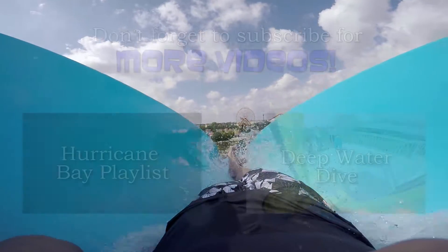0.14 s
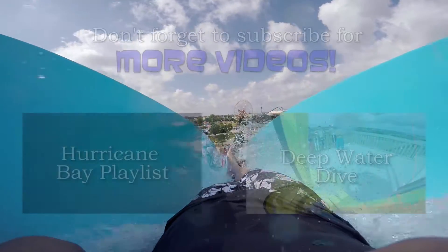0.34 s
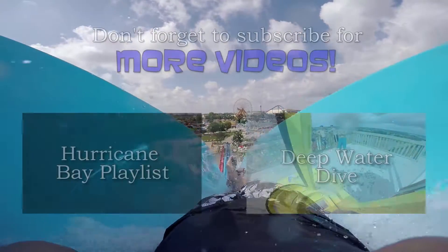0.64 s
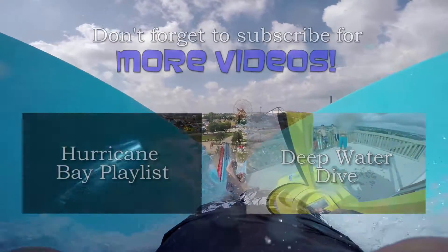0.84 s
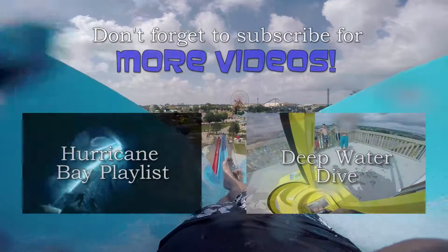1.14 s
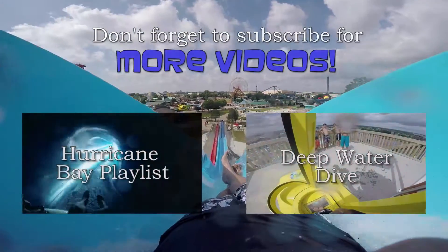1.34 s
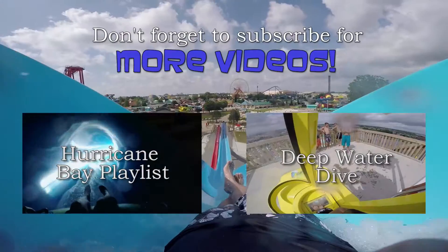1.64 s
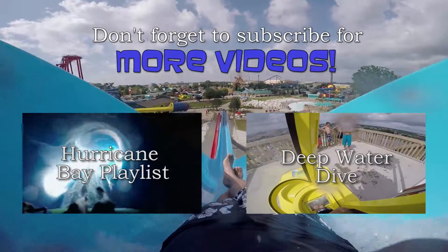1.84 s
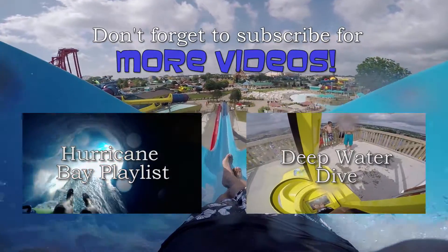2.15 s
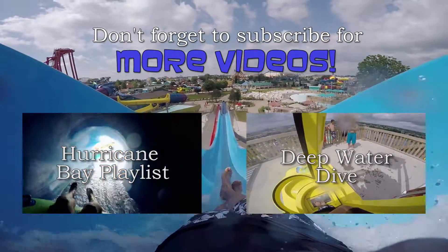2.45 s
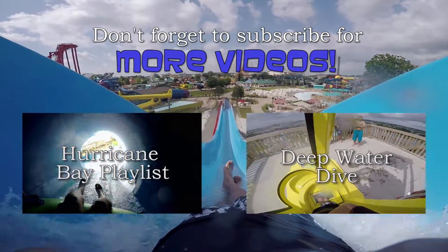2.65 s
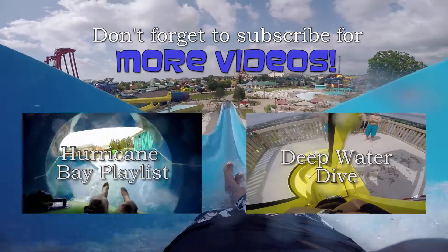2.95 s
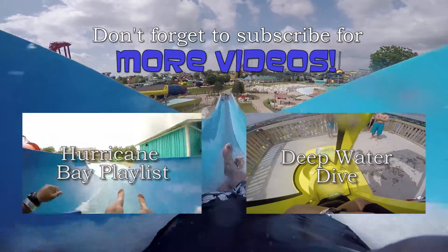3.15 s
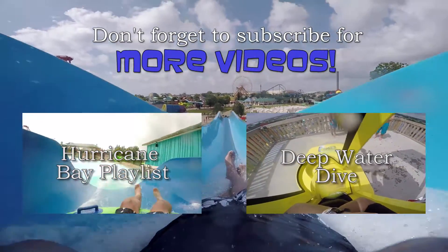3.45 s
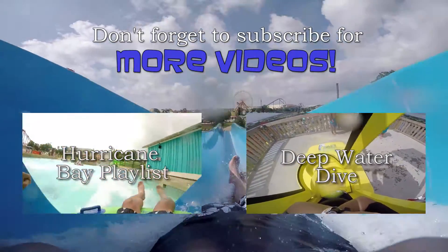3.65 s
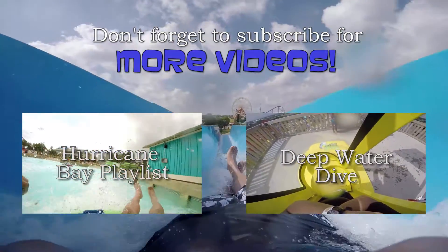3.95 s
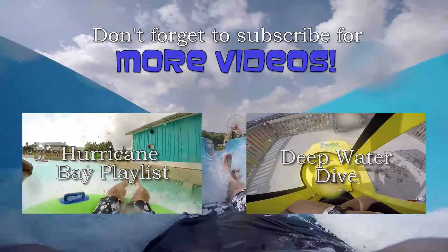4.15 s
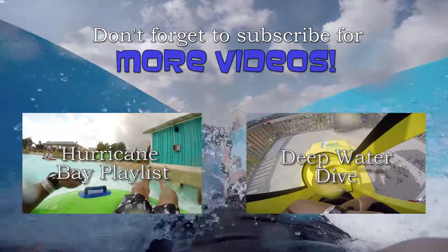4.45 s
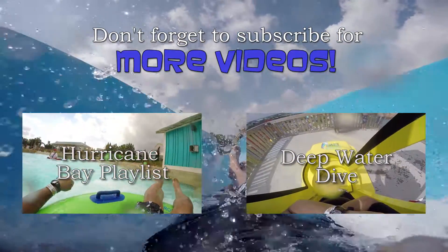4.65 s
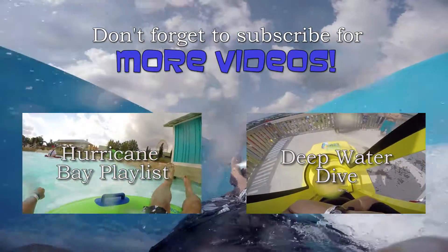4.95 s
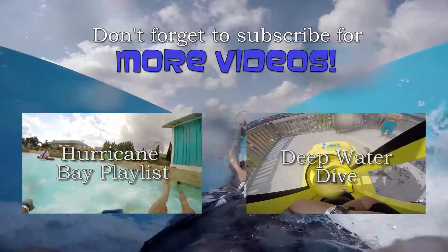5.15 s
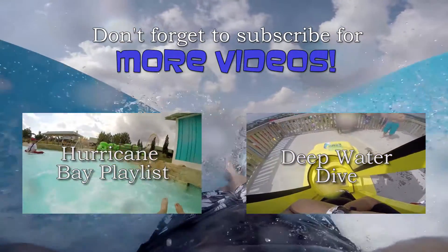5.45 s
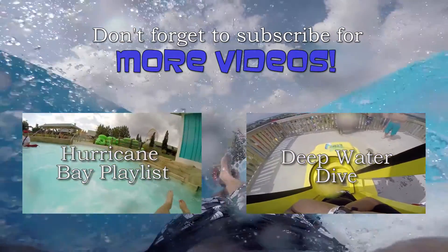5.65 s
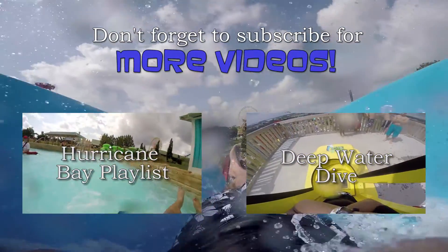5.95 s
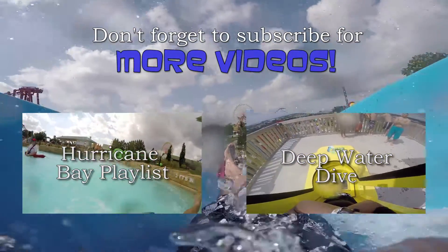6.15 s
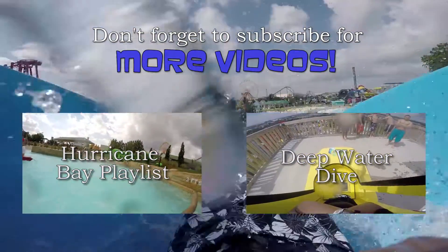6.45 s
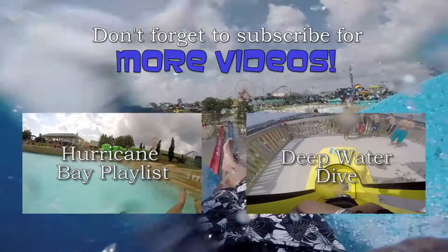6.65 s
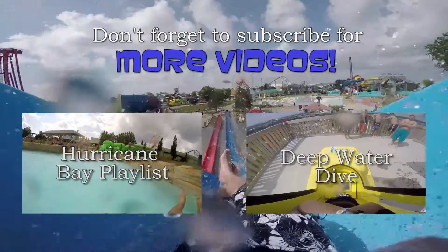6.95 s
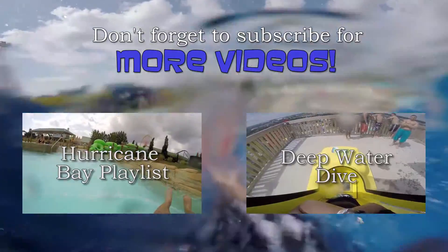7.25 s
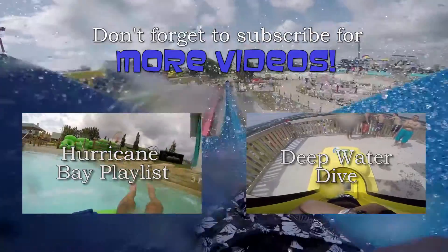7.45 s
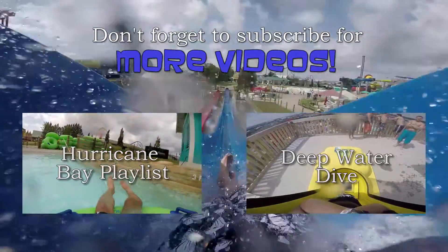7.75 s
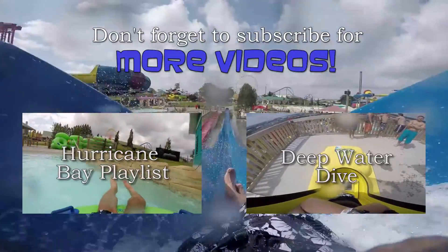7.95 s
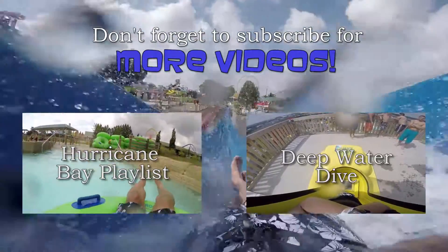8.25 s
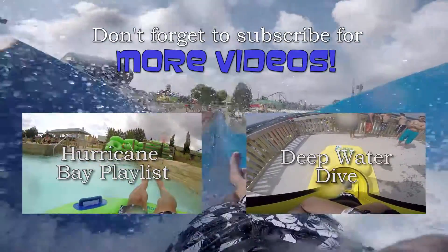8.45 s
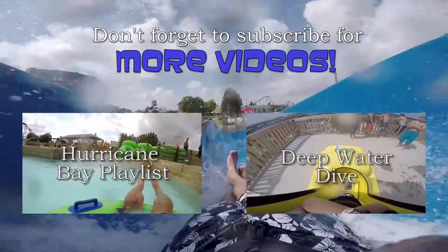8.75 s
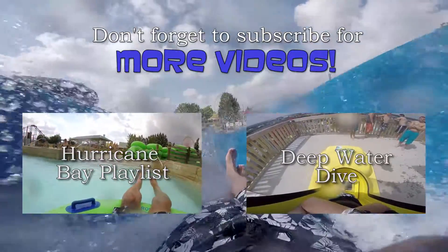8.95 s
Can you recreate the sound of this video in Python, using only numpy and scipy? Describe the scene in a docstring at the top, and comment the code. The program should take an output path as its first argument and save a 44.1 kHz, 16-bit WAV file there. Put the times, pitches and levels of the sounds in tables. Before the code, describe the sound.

Water rushes and gurgles around a rider on a water slide, building from a steady wash to heavy slops, splashes and sharp knocks.

```python
"""Water chute ride inside a sealed housing

A rider slides down an open water chute, heard from inside a sealed plastic camera housing on the chest.
Shaped noise gives the rush and low churn of the water sheet, and the jolting that pumps the housing in the bass.
Spray, drops and heavy slops are impulses that ring damped housing modes; drops and slops add short tones
of their own. Bumps are single damped pushes, mist is crackling hiss, and splashes lift the water layers."""
import sys
import numpy as np
from scipy import signal
from scipy.fft import rfft, irfft, next_fast_len
from scipy.io import wavfile
from scipy.ndimage import uniform_filter1d

SR = 44100
rng = np.random.default_rng(int(sys.argv[2]) if len(sys.argv) > 2 else 0)


def wav_out(sig):
    """Save sig, one row per channel (or a flat mono array), as 16-bit PCM at SR to the path in sys.argv[1]."""
    wavfile.write(sys.argv[1], SR, np.round(np.clip(np.atleast_2d(sig).T, -1, 1) * 32767).astype(np.int16))


N = 401751

# Levels in the tables and settings are nominal: the layers scale them further.
# Modes of the plastic housing: [f/Hz, level/dB, t60/s]
HOUSING_MODES = [(94, -6.5, 0.06), (172, -9, 0.049), (302, -9.5, 0.013), (469, 3.5, 0.024),
                 (590, -4, 0.019), (870, -6, 0.021), (1004, -2.5, 0.043), (1231, -2.5, 0.035),
                 (1566, 1, 0.0094), (2222, 3.5, 0.0061), (2800, -7.5, 0.017), (3275, -2.5, 0.012),
                 (3526, -4, 0.011), (5070, -14, 0.0087), (6390, -9.5, 0.011), (7200, -18.5, 0.015)]
# Noise spectra of the jolting, churn, rush and mist: [f/Hz, relative level/dB]
JOLT_SPECTRUM = [(3, -33.5), (6, -2.5), (17, 4), (24, 2), (33, -8.5), (54, -18), (100, -41.5), (200, -58)]
CHURN_SPECTRUM = [(50, 9.5), (90, 2.5), (200, -2.5), (450, -3.5), (750, -7), (1100, -51)]
RUSH_SPECTRUM = [(350, -57.5), (600, -27), (655, -19), (875, -7.5), (948, -13.5), (981, -10), (1050, -9.5),
                 (1150, -4.5), (1370, -3), (1470, -6), (1750, -16.5), (2030, -16), (3000, -21),
                 (3900, -41.5), (6600, -120)]
MIST_SPECTRUM = [(2500, -17.5), (3800, 1.5), (5000, -1.5), (6250, -4), (7400, -6.5), (8400, -44.5)]

# Strength of the jolting: [t/s, level/dB]
JOLTING_LEVEL = [(0.0, -33.5), (0.15, -28), (1.85, -33.5), (2.6, -24), (2.95, -33), (3.14, -20.5),
                 (3.27, -25.5), (3.4, -12.5), (3.5, -24), (3.78, -14.5), (3.9, -19.5), (4.16, -16.5),
                 (4.41, -31), (4.77, -17.5), (4.92, -24.5), (5.4, -17.5), (5.74, -21), (5.85, -30.5),
                 (6.3, -32.5), (7.28, -32.5), (7.5, -20), (7.62, -17), (7.7, -29), (7.74, -33), (7.91, -51),
                 (8.02, -28.5), (8.27, -19), (8.36, -35), (8.45, -23), (8.9, -19), (9.11, -25)]
# Water between splashes: [t/s, rush level/dB, low churn level/dB, spray level/dB]
RIDE_LEVELS = [(0.0, -43, -49.5, -55), (0.35, -38, -49, -48.5), (0.8, -40.5, -48, -49.5),
               (1.17, -41, -48, -53.5), (1.68, -40, -45.5, -56), (1.76, -36, -46.5, -56.5),
               (1.93, -40, -46, -57), (2.04, -32, -45, -49.5), (2.15, -36.5, -45, -50.5),
               (2.5, -34, -42.5, -51.5), (2.69, -35.5, -45.5, -52.5), (2.76, -32, -44, -51),
               (2.84, -36.5, -45, -51), (3.2, -34, -41, -46), (3.497, -37, -48, -40),
               (4.1, -31, -35.5, -44.5), (4.45, -36, -42.5, -42), (4.9, -33, -39.5, -36.5),
               (5.1, -35.5, -40.5, -40.5), (5.65, -30.5, -38, -39.5), (5.85, -37.5, -38.5, -44.5),
               (6.34, -32.5, -36.5, -43.5), (6.9, -39, -40.5, -45), (7.1, -39.5, -40, -46.5),
               (7.48, -34.5, -32, -39), (7.72, -35, -35, -36), (7.735, -34, -47, -43),
               (7.76, -40, -46, -45), (7.8, -38.5, -42, -55), (7.851, -57, -47, -54),
               (7.971, -54, -54, -56.5), (7.98, -41.5, -47, -48), (8.17, -38.5, -43, -42.5),
               (8.47, -32.5, -38, -35), (8.9, -39, -42.5, -37), (9.11, -26.5, -34, -31)]
# Rush brightening or darkening as the sheet thins or thickens: [t/s, upper over lower part level/dB]
RUSH_BALANCE = [(0, 5), (0.7, 2.5), (1.3, 2), (2.2, 4.5), (3.1, 6), (3.6, 1.5), (5, 2.5), (6.3, -2),
                (6.8, -3.5), (7.5, -3.5), (8, 0.5), (9.11, -2.5)]

# Sheets of water thrown over the housing: [start t/s, length/s, spray gain/dB]
SPLASH_SHEETS = [(0.518, 0.04, 4), (3.304, 0.12, 6), (3.577, 0.19, 9.5), (3.832, .06, 4),
                 (4.299, 0.12, 5.5), (4.486, 0.21, 6), (5.713, 0.11, 7), (6.718, 0.052, 5),
                 (7.168, 0.055, 3.5), (7.549, 0.13, 7.5), (8.039, .04, 5), (8.227, 0.13, 6.5),
                 (8.605, 0.067, 5.5), (8.683, 0.06, 2.5), (9.018, 0.17, 5.5)]
# Bumps that shove the whole housing: [t/s, strength/dB, push length/ms, rebound t60/ms]
BUMPS = [(0.904, -27, 1.35, 9.1), (0.96, -28, 1.7, 13), (1.0528, -22.5, 2, 9.3), (3.1262, -17, 1.4, 35),
         (3.131, -18, 6.7, 58), (3.134, -8, 8.6, 57), (4.0228, -33, 0.84, 7), (4.568, -12, 0.59, 6),
         (4.6192, -6, 0.31, 6.6), (4.6207, 1, 0.61, 5.6), (5.748, -13.5, 1.2, 14), (6.577, -18.5, 11, 61),
         (7.139, -11.5, 12, 51), (7.272, -9.5, 7.4, 36), (7.714, -13.5, 5.5, 37), (8.41, -8, 0.84, 7.8),
         (8.6058, -4, 1.16, 9), (8.6059, -11, 2.3, 14), (8.607, -15, 5.3, 20), (8.6297, -12, 0.6, 6),
         (8.6376, -9, 0.83, 7), (8.6423, -6, 0.85, 11), (8.884, -14, 0.82, 9)]
# Slops of water that knock the housing at set times: [t/s, peak level/dB, pitch f/Hz, thud level/dB]
TIMED_SLOPS = [(0.344, -24.5, 990, -52.5), (0.5408, -24, 1010, -55.5), (0.7193, -21.5, 1030, -55),
               (0.7531, -16, 1190, -52), (0.7868, -17, 1220, -52), (0.9036, -17.5, 990, -47),
               (0.959, -31, 1010, -44), (1.01, -27, 676, -42), (1.0542, -21, 975, -37),
               (1.1877, -17, 1220, -62), (1.262, -24.5, 1060, -64), (2.752, -23, 1360, -57),
               (3.1245, -18, 1180, -44), (3.127, -20.5, 790, -47), (3.146, -23, 450, -45),
               (3.171, -32, 430, -50), (3.4521, -17.5, 1010, -45), (3.5761, -27, 990, -50),
               (3.8384, -12.5, 1400, -51), (3.9889, -17.5, 1200, -52), (4.0222, -9, 1210, -43),
               (4.0676, -17, 1010, -49), (4.2436, -13, 1180, -39), (4.338, -14, 1020, -51),
               (4.5069, -20, 1010, -51), (4.5685, -14.5, 1270, -50), (4.601, -19, 1260, -52),
               (4.606, -18, 1200, -52), (4.6205, -9, 885, -35), (4.631, -14, 1050, -49),
               (4.7478, -16, 890, -49), (4.7947, -16, 1230, -56), (4.8227, -20.5, 1030, -49),
               (4.8689, -24, 1020, -51), (4.9267, -15, 1060, -48), (5.0349, -24, 1210, -53),
               (5.0704, -17, 1210, -37), (5.1359, -17, 1270, -47), (5.6661, -14, 1240, -50),
               (5.7351, -14, 1200, -41), (5.7605, -9, 1000, -38), (5.8027, -10.5, 1200, -34),
               (6.2586, -16.5, 1170, -32.5), (6.5757, -15, 1010, -30), (6.6642, -13.5, 1030, -50),
               (6.7018, -15, 1060, -47), (6.7284, -10, 1260, -49), (6.7561, -1.5, 1035, -51),
               (6.8671, -18, 1000, -37), (6.9071, -20, 980, -45), (6.9302, -21, 980, -57),
               (6.95, -18, 960, -29), (7.0243, -14, 1100, -54), (7.1402, -10, 1120, -21.5),
               (7.1803, -16, 1010, -42), (7.196, -6, 1040, -37.5), (7.2745, -11, 1020, -29),
               (7.3021, -13.5, 1120, -44), (7.3383, -16.5, 1030, -47), (7.434, -17, 413, -49),
               (7.436, -16, 1040, -50), (7.479, -26, 800, -42), (7.496, -15.5, 630, -41),
               (7.5277, -11.5, 1340, -29), (7.5573, -12, 1210, -37), (7.576, -1, 1150, -41),
               (7.5845, -1.5, 1440, -38), (7.5985, -15, 1010, -42), (7.645, -14, 1100, -40),
               (7.6267, -11, 1410, -39.5), (7.6552, -17, 404, -19.5), (7.6771, -12, 960, -25),
               (7.7125, -19, 840, -42), (8.058, -15, 1210, -38), (8.2347, -18.5, 1020, -32),
               (8.3549, -14, 1170, -46), (8.4102, -23, 940, -31), (8.4255, -24, 1290, -46),
               (8.4588, -15, 1140, -38), (8.5024, -17, 1030, -48), (8.5344, -13, 1200, -31),
               (8.5455, -14, 1140, -37), (8.289, -19.5, 1010, -46), (8.6065, -4.5, 980, -31),
               (8.63, -14, 1400, -37), (8.6377, -11, 1250, -38), (8.6435, -11, 1010, -47),
               (8.6839, -6.5, 1100, -49), (8.7064, -3.5, 1210, -50), (8.711, -24, 655, -43),
               (8.7428, -12.5, 1050, -46), (8.8844, -19, 1000, -39), (8.8895, -13, 1050, -45),
               (8.9049, -17, 1410, -46), (8.9831, -13, 1190, -46), (9.0281, -8.5, 1240, -45),
               (9.0407, -19, 880, -50), (9.102, -6.5, 1070, -29)]
# Drops on the housing at set times: [t/s, peak level/dB, pitch f/Hz, crack level/dB]
TIMED_DROPS = [(0.1124, -20, 2200, -44), (0.346, -29, 2140, -49), (0.359, -26.5, 2100, -49),
               (0.436, -34, 2200, -55), (0.4769, -28, 2900, -38), (0.541, -33, 3300, -49.5),
               (0.751, -26, 2800, -48), (0.806, -29, 1900, -55), (0.526, -29, 2090, -51),
               (0.5529, -19.5, 2170, -44), (0.5745, -24, 2200, -47), (0.5895, -31, 3300, -50),
               (0.599, -30, 2240, -53), (0.6451, -25, 2800, -47.5), (0.6682, -23, 3250, -44),
               (0.6947, -25.5, 2120, -55), (0.72, -27, 3300, -52), (0.7437, -28, 1900, -42),
               (0.7865, -23, 2070, -55), (0.8205, -31, 3240, -51), (0.8481, -45, 3300, -61),
               (0.8955, -32.5, 2830, -61), (0.9585, -37, 3400, -49), (0.977, -38, 3400, -47),
               (1.0046, -27.5, 2800, -48.5), (1.0533, -35, 4830, -48), (1.1868, -22.5, 2140, -38.5),
               (1.197, -19.5, 2160, -48), (1.262, -33, 2840, -50), (1.409, -29, 2800, -45),
               (1.7956, -24, 3580, -49), (2.03, -34, 2300, -55), (2.185, -29.5, 3400, -51),
               (2.31, -30, 3300, -49.5), (3.08, -26, 2200, -51), (2.4218, -23, 2240, -50),
               (3.2851, -20.5, 2230, -56), (3.3134, -23.5, 2230, -47), (3.3222, -25, 3400, -44),
               (3.338, -38, 3300, -48), (3.359, -28, 3380, -39), (3.37, -23, 3400, -46),
               (3.3794, -28.5, 2800, -42), (3.3893, -17, 3390, -39), (3.401, -27, 3300, -48),
               (3.4146, -18, 2740, -37), (3.446, -10.5, 2210, -36), (3.4575, -18, 2110, -44),
               (3.4807, -34, 2130, -57), (3.521, -27, 2240, -46), (3.534, -20, 3300, -47),
               (3.553, -20, 2120, -48), (3.564, -28, 2200, -43), (3.576, -18, 1950, -33),
               (3.5853, -14, 2230, -42), (3.6041, -16.5, 2100, -31), (3.6254, -14, 2170, -35),
               (3.6398, -23, 2080, -47), (3.6511, -16, 2250, -29), (3.6721, -15, 3440, -45),
               (3.701, -9.5, 2140, -25.5), (3.7526, -23, 1900, -51), (3.7954, -19, 2160, -42),
               (3.8372, -21, 1870, -43), (3.848, -12.5, 3270, -29), (3.874, -33, 6400, -49),
               (3.8817, -18, 2110, -39), (3.893, -26.5, 5000, -45), (3.9153, -35, 5400, -50),
               (3.9382, -25, 3500, -42), (3.9567, -29, 6330, -38), (3.965, -31, 5000, -37),
               (4.0217, -33, 1900, -40), (4.027, -18, 3350, -50), (4.0417, -12, 2240, -38),
               (4.059, -35, 5000, -45), (4.077, -19.5, 3460, -38), (4.0911, -21, 2150, -35),
               (4.103, -20, 3300, -47), (4.148, -45, 3400, -53), (4.2435, -30.5, 2400, -44),
               (4.261, -27, 3300, -46), (4.2825, -33, 3500, -50), (4.3044, -10, 2140, -37.5),
               (4.3108, -13, 2200, -36), (4.4077, -36, 4000, -38), (4.508, -31, 5390, -44),
               (4.5653, -18, 2170, -31), (4.5758, -21, 2750, -42), (4.601, -25, 3300, -41),
               (4.619, -17.5, 6300, -40), (4.6505, -15, 2210, -40), (4.655, -21, 2200, -48),
               (4.6649, -21, 2170, -54), (4.6814, -18, 2110, -55), (4.7716, -17, 3400, -29.5),
               (4.8168, -27, 4000, -45), (4.8452, -34, 4870, -41), (4.8688, -14.5, 2180, -33),
               (4.9044, -10.5, 2180, -39), (4.9137, -14, 2200, -43), (4.947, -15.5, 2180, -37),
               (4.958, -21, 2160, -46), (5.0124, -18, 2110, -48), (5.0354, -9, 2120, -30.5),
               (5.1328, -17.5, 2140, -41), (5.1469, -22, 2140, -51), (5.1899, -13, 2110, -49),
               (5.2338, -35, 5300, -46), (5.2997, -24, 2200, -55), (5.541, -21.5, 4730, -39.5),
               (5.6521, -17, 2180, -37), (5.73, -19, 2110, -42), (5.748, -19, 6100, -31),
               (5.7698, -15.5, 2140, -38), (5.803, -19, 2070, -48), (5.815, -25, 6200, -45),
               (5.948, -55, 4850, -52), (5.99, -33, 6340, -46), (6.009, -27, 4490, -42),
               (6.051, -25.5, 3040, -50), (6.086, -26.5, 6100, -47), (6.104, -34.5, 6200, -46),
               (6.1123, -2.5, 3910, -38), (6.1275, -24, 5040, -46), (6.1802, -26, 2170, -53),
               (6.192, -39, 3300, -45), (6.2585, -26, 2790, -41), (6.275, -33, 6200, -43),
               (6.3084, -36, 4820, -52), (6.3422, -25, 2190, -59), (6.388, -15.5, 2100, -40),
               (6.4355, -24, 2170, -46), (6.5739, -21.5, 2120, -38), (6.6253, -16.5, 3220, -36),
               (6.6456, -23, 5860, -38), (6.658, -27, 5000, -42), (6.664, -20, 1920, -42),
               (6.729, -12.5, 2210, -32.5), (6.7571, -7.5, 2790, -28), (6.7948, -23.5, 2120, -46),
               (6.8376, -15, 2140, -39), (6.8677, -22.5, 1880, -51), (6.9501, -23.5, 2800, -53),
               (7.024, -29, 1870, -45.5), (7.0447, -34, 3500, -51), (7.1403, -17.5, 1900, -41),
               (7.158, -20, 2200, -48), (7.181, -27, 2190, -34), (7.215, -30.5, 4600, -46),
               (7.224, -34, 5300, -48), (7.261, -26, 2000, -52), (7.1974, -7, 2630, -19),
               (7.2774, -12.5, 2600, -27.5), (7.2999, -18, 3330, -43), (7.307, -25, 3300, -33),
               (7.3267, -12, 2130, -41), (7.3423, -19, 2150, -41), (7.383, -32, 3300, -50),
               (7.4063, -18.5, 2190, -50), (7.4323, -39, 3320, -49), (7.4872, -37, 3400, -46),
               (7.5216, -25, 3300, -36), (7.542, -13.5, 3250, -35), (7.5563, -9, 2160, -37),
               (7.5763, -10, 2070, -24), (7.5635, -15, 2150, -39), (7.5847, -2, 1970, -29),
               (7.5985, -16, 2150, -40), (7.6129, -11, 2200, -39), (7.6241, -2, 2820, -30),
               (7.6342, -19, 2040, -36), (7.6442, -13, 2050, -41), (7.6831, -11, 2100, -39),
               (7.6882, -11.5, 4930, -44), (7.7111, 1, 2560, -17.5), (7.799, -28, 6200, -56),
               (7.841, -30, 2070, -66), (7.978, -36, 3250, -56), (7.9921, -23, 2130, -48),
               (8.02, -34, 4450, -47), (8.026, -26, 2710, -52), (8.0438, -20, 2170, -56),
               (8.0586, -15, 2200, -34), (8.1228, -26, 2220, -50), (8.165, -29, 2130, -44),
               (8.186, -25, 5000, -42), (8.2, -23.5, 2130, -45), (8.2096, -22, 3290, -40),
               (8.234, -17, 1830, -39), (8.247, -25, 3240, -40), (8.2618, -12.5, 2040, -28.5),
               (8.253, -17, 3400, -45), (8.272, -17, 3280, -44), (8.284, -12, 2300, -30),
               (8.296, -17, 2800, -33), (8.3027, -9, 2040, -28), (8.3122, -8.5, 2200, -30),
               (8.3208, -11, 2160, -37), (8.336, -27, 3300, -45), (8.35, -11.5, 3450, -42),
               (8.3585, -12, 2150, -45), (8.3837, -12.5, 2750, -37), (8.4099, -13, 2150, -31),
               (8.4304, -12.5, 2160, -34), (8.475, -26, 2090, -37), (8.5208, -9, 2150, -30),
               (8.5323, -2.5, 2130, -26), (8.5677, -26, 4540, -41), (8.5928, -23, 2090, -32),
               (8.6039, -3.5, 3120, -22), (8.629, -30, 3300, -37), (8.6555, -27, 6290, -47),
               (8.664, -26, 3300, -40), (8.7074, -14, 1840, -24.5), (8.7403, -31, 5040, -41),
               (8.755, -18.5, 3240, -34), (8.7928, -13, 2150, -28), (8.8273, -27, 2150, -43),
               (8.8396, -16.5, 2230, -38), (8.889, -21, 5440, -30), (8.8988, -17, 3180, -32),
               (8.9918, -24, 3280, -42), (9.0282, -8.5, 2140, -41), (9.0752, -1, 2130, -48),
               (9.102, -17, 2120, -46)]

RUSH_SPLIT_HZ, RUSH_TOP_HZ = 1200, 1700
# Soft edges of a splash; dB gained by rush and churn per dB of spray gain
SPLASH_EDGE_S, SPLASH_RUSH_SHARE, SPLASH_CHURN_SHARE = 0.027, 0.56, 0.073
# Mist level at a spray level of -41 dB; dB gained per dB of spray
MIST_DB, MIST_FOLLOWS = -50.5, 0.67
# Further slops at random, with pitches in a common range: least peak over the rush, spread of sizes, thud
# relative to the peak; pitch range
LAPPING_OVER_DB, LAPPING_SPREAD_DB, LAPPING_THUD_DB = 6.5, 3, -31.5
LAPPING_LOW_HZ, LAPPING_HIGH_HZ = 990, 1260
# Further drops at random: least peak over the spray, spread of sizes, crack relative to the peak
PATTER_OVER_DB, PATTER_SPREAD_DB, PATTER_CRACK_DB = 7, 2, -23
# Reference pitch, share that ring higher, dB gained in rate per dB of spray
PATTER_HZ, PATTER_HIGH_SHARE, PATTER_CROWDING = 2110, 0.32, 0.3
MIC_DRIVE, TOP_HZ = 1.25, 7750


def undb(db):
    """Level to amplitude: 20 dB is a factor of ten."""
    return 10 ** (np.asarray(db) / 20)


def unit(x):
    """Normalisation to an rms of 1."""
    return x / np.sqrt(np.mean(x ** 2))


def coloured(spectrum):
    """Spectral shaping: white noise weighted by a spectrum over log frequency, with rms 1."""
    size = next_fast_len(N)
    hz, db = np.transpose(spectrum)
    bin_hz = np.arange(1, size // 2 + 2) * SR / size
    gain = undb(np.interp(np.log(bin_hz), np.log(hz), db, right=-120))
    noise = rfft(rng.standard_normal(size))
    return unit(irfft(noise * gain, size)[:N])


def walk(rate):
    """Slow random modulation: levels held 1 / rate s, smoothed twice, with rms 1."""
    hold = max(int(SR / rate), 1)
    steps = np.repeat(rng.standard_normal(N // hold + 1), hold)
    smooth = uniform_filter1d(uniform_filter1d(steps, hold), hold)
    return unit(smooth[:N])


def curves(table):
    """Linear interpolation in dB: each level column becomes a gain over time."""
    s, *columns = np.transpose(table)
    return [undb(np.interp(np.arange(N) / SR, s, c)) for c in columns]


def taps(s, size):
    """Impulsive excitation: impulses of the given sizes at the given times."""
    return np.bincount(np.clip((s * SR).astype(int), 0, N - 1), size, N)


def mode(x, hz, t60):
    """Damped resonance: a unit impulse rings as a sine whose envelope decays from 1."""
    pole = np.exp((2j * np.pi * hz - np.log(1000) / t60) / SR)
    return signal.lfilter([1], [1, -pole], x).imag


def fade(x, t60):
    """Exponential decay: every impulse becomes a sharp rise with a tail."""
    return signal.lfilter([1], [1, -np.exp(-np.log(1000) / t60 / SR)], x)


def housing(s, size, hz, reach_octaves, scatter_db, contact_s):
    """Modal excitation: a blow wakes modes near its pitch most, with scattered strength, sign and delay."""
    chance = rng.random((len(s), len(HOUSING_MODES), 3))
    out = np.zeros(N)
    # the scatter stands for where each blow lands
    for (f, db, t60), (strength, sign, delay) in zip(HOUSING_MODES, chance.transpose(1, 2, 0)):
        near = np.exp(-.5 * (np.log2(f / hz) / reach_octaves) ** 2)
        gain = undb(db + scatter_db * (2 * strength - 2))
        weight = size * near * gain * np.sign(sign - .5)
        out += mode(taps(s + contact_s * delay, weight), f, t60)
    return out


def blips(s, size, hz, cycles):
    """Damped oscillation of trapped water: each blow rings and dies within a few cycles."""
    out, t = np.zeros(N), np.arange(SR // 12) / SR
    for start, a, f in zip((s * SR).astype(int), size, hz):
        envelope = np.exp(-f * t / cycles) * (1 - np.exp(-f * t / 0.57))
        ring = a * np.sin(2 * np.pi * f * t) * envelope
        out[start:start + len(t)] += ring[:N - start]
    return out


def water_db():
    """Superposed levels: rush, churn and spray in dB follow the ride and are lifted by each splash."""
    t = np.arange(N) / SR
    lift = sum(db * ((t > s) & (t < s + length)) for s, length, db in SPLASH_SHEETS)
    lift = uniform_filter1d(lift.astype(float), int(SPLASH_EDGE_S * SR))
    s, rush_db, churn_db, wet_db = np.transpose(RIDE_LEVELS)
    return (np.interp(t, s, rush_db) + SPLASH_RUSH_SHARE * lift,
            np.interp(t, s, churn_db) + SPLASH_CHURN_SHARE * lift,
            np.interp(t, s, wet_db) + lift)


def jolting():
    """Low-frequency pumping: deep noise, evened from swing to swing, moves the housing under a level curve."""
    pump = coloured(JOLT_SPECTRUM)
    swing = np.sqrt(uniform_filter1d(pump ** 2, int(0.15 * SR)) + 0.18)
    return curves(JOLTING_LEVEL)[0] * undb(1.0 * walk(12.0)) * unit(pump / swing)


def churn(churn_db, surge):
    """Amplitude-modulated turbulence: low noise swells with the surges and wavers on its own."""
    return undb(churn_db + 1.5 * surge + 1.7 * walk(40)) * coloured(CHURN_SPECTRUM)


def rush(rush_db, surge):
    """Broadband turbulence: three bands flicker apart while weight shifts between the lower two."""
    level = undb(rush_db - 0.5 + 0.72 * surge + 0.87 * walk(60))
    whole = coloured(RUSH_SPECTRUM)
    lower, lower_two = (signal.sosfiltfilt(signal.butter(4, hz, fs=SR, output="sos"), whole)
                        for hz in (RUSH_SPLIT_HZ, RUSH_TOP_HZ))
    tilt = np.sqrt(curves(RUSH_BALANCE)[0])
    low_band = undb(1.0 * walk(60)) * lower / tilt
    middle_band = undb(2.1 * walk(60)) * (lower_two - lower) * tilt
    high_band = undb(1.0 * walk(90)) * (whole - lower_two)
    return level * unit(low_band + middle_band + high_band)


def spray(count, tail_db, most_db):
    """Random impact noise: many small drops, a few bigger, give a modal ring and a crackle envelope."""
    when, pitch, size = rng.random((count, 3)).T
    s = when * N / SR
    size = undb(np.minimum(-tail_db * np.log(1 - size), most_db))
    hz = 1050 * 2 ** (2.4 * pitch)
    ring = housing(s, size, hz, reach_octaves=0.91, scatter_db=8, contact_s=.0015)
    # the ring is scaled by its strength in this band
    treble = signal.sosfilt(signal.butter(4, [1900, 3800], "bandpass", fs=SR, output="sos"), ring)
    return ring / treble.std(), unit(fade(taps(s, size), 0.039))


def mist(wet_db, surge, crackle):
    """Modulated hiss: fine mist follows the spray level and crackles with its drops."""
    mist_db = MIST_DB + MIST_FOLLOWS * (wet_db + 41)
    return undb(mist_db + 0.78 * surge) * (0.57 + 0.38 * crackle) * coloured(MIST_SPECTRUM)


def slaps():
    """Damped pressure pulse: each bump is one half-cycle push followed by a decaying rebound."""
    out = np.zeros(N)
    for s, strength_db, push_ms, ring_ms in BUMPS:
        out += mode(taps(np.array([s]), undb([strength_db])), 500 / push_ms, ring_ms / 1000)
    return out


def lapping(rush_db, count):
    """Random impacts: rows of further slops at chance moments, with peaks that follow the rush."""
    when, size, pitch = rng.random((count, 3)).T
    peak_db = rush_db[(when * N).astype(int)] + LAPPING_OVER_DB - LAPPING_SPREAD_DB * np.log(1 - .95 * size)
    hz = LAPPING_LOW_HZ + (LAPPING_HIGH_HZ - LAPPING_LOW_HZ) * pitch
    return np.transpose([when * N / SR, peak_db, hz, peak_db + LAPPING_THUD_DB])


def slops(rush_db):
    """Heavy impact: a gulp at its own pitch, the nearby housing modes and a thud in the lowest ones."""
    s, peak_db, hz, thud_db = np.vstack([TIMED_SLOPS, lapping(rush_db, count=60)]).T
    # octaves under 950 Hz: deep slops spread wider and ring less
    deep = np.clip(np.log2(950 / hz), 0, 2)
    knock = housing(s, undb(peak_db - 1.9 * deep), hz, reach_octaves=0.66 + 2.2 * deep,
                    scatter_db=4.0, contact_s=0.002045)
    thud = housing(s, undb(thud_db), 200.0, reach_octaves=0.94, scatter_db=-0.5, contact_s=0.0026)
    gulp = blips(s, undb(peak_db + 1.5 - 1.3 * deep), hz, cycles=2.24)
    return undb(-3.0) * knock + undb(9.0) * thud + gulp


def patter(wet_db, count):
    """Random impacts of varying density: rows of further drops, denser and stronger in heavy spray."""
    when, size, pitch, high = rng.random((count, 4)).T
    crowd = np.cumsum(undb(PATTER_CROWDING * wet_db))
    when = np.interp(when * crowd[-1], crowd, np.arange(N) / N)
    peak_db = wet_db[(when * N).astype(int)] + PATTER_OVER_DB - PATTER_SPREAD_DB * np.log(1 - .95 * size)
    hz = PATTER_HZ * np.where(high < PATTER_HIGH_SHARE, 1.5 + .35 * pitch, 0.73 + .16 * pitch)
    return np.transpose([when * N / SR, peak_db, hz, peak_db + PATTER_CRACK_DB])


def drops(wet_db):
    """Light impact: each drop gives its own ring, nearby housing modes and a splat of hiss."""
    s, peak_db, hz, crack_db = np.vstack([TIMED_DROPS, patter(wet_db, count=340)]).T
    knock = housing(s, undb(peak_db), hz, reach_octaves=0.65, scatter_db=5.0, contact_s=0.001903)
    ring = blips(s, undb(peak_db - 0.26), hz, cycles=4.46)
    cracks = taps(s, undb(crack_db))
    splat = fade(cracks, 0.01) - fade(cracks, 0.0011)  # the drop takes a moment to spread
    return undb(-1.5) * knock + ring + undb(9.0) * splat * coloured(MIST_SPECTRUM)


def scene():
    """Linear superposition: all layers add, and the water noises share quick surges."""
    rush_db, churn_db, wet_db = water_db()
    ring, crackle = spray(count=4500, tail_db=3.5, most_db=14.5)
    surge = walk(25)
    out = jolting()
    out += churn(churn_db, surge)
    out += rush(rush_db, surge)
    out += undb(wet_db - 2.0 + 0.89 * surge) * ring
    out += mist(wet_db, surge, crackle)
    out += drops(wet_db) + slops(rush_db) + slaps()
    return out[None]


def record(dry):
    """Saturation and band limiting: the microphone rounds the loudest raps and cuts the top."""
    rounded = np.tanh(MIC_DRIVE * dry) / MIC_DRIVE
    return signal.sosfilt(signal.ellip(8, .2, 45, TOP_HZ, fs=SR, output="sos"), rounded)


dry = scene()
out = record(dry)
wav_out(out)
```